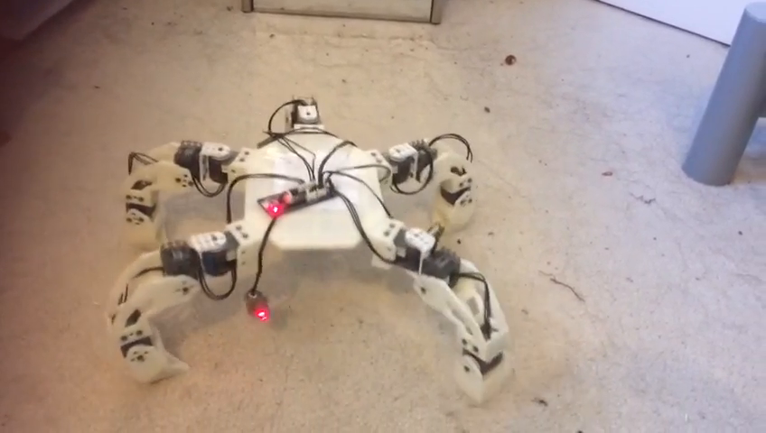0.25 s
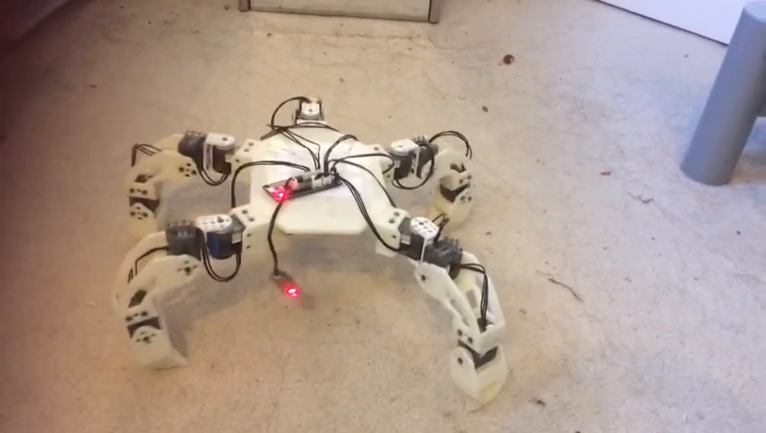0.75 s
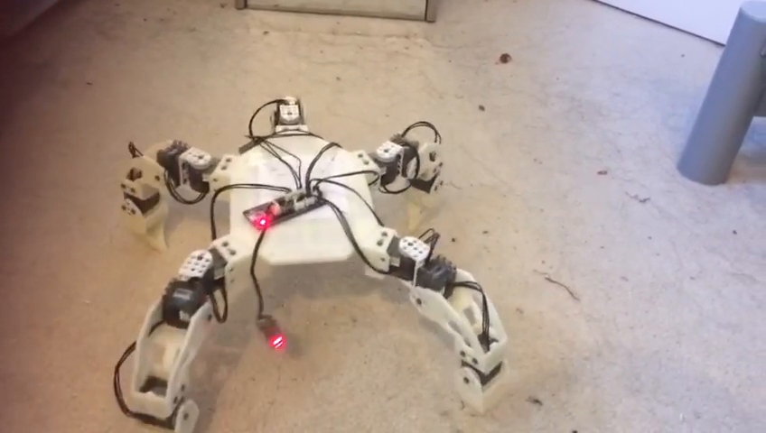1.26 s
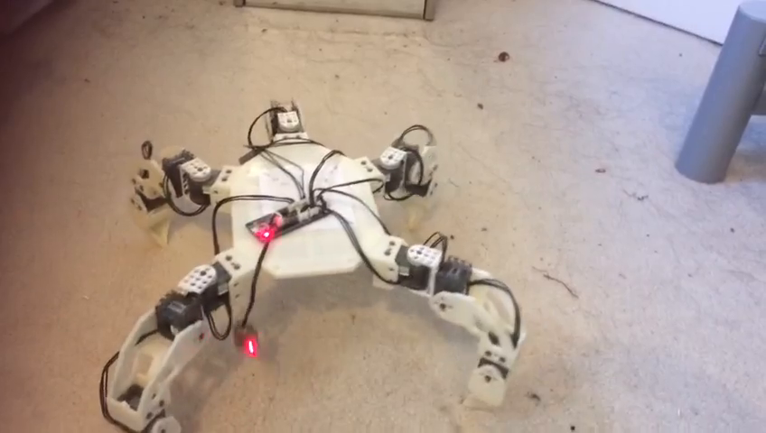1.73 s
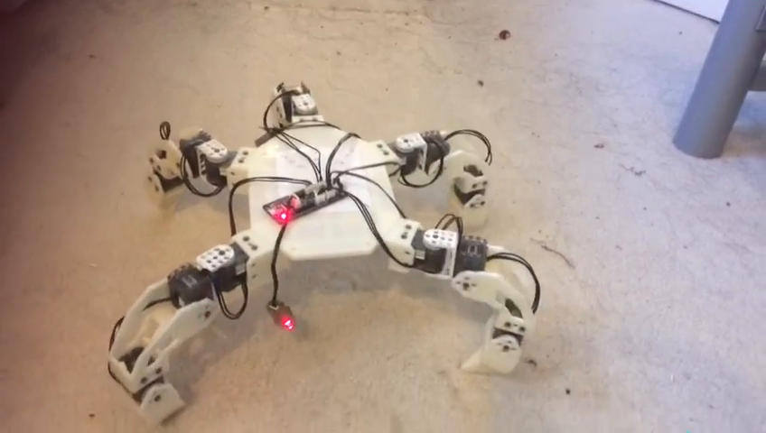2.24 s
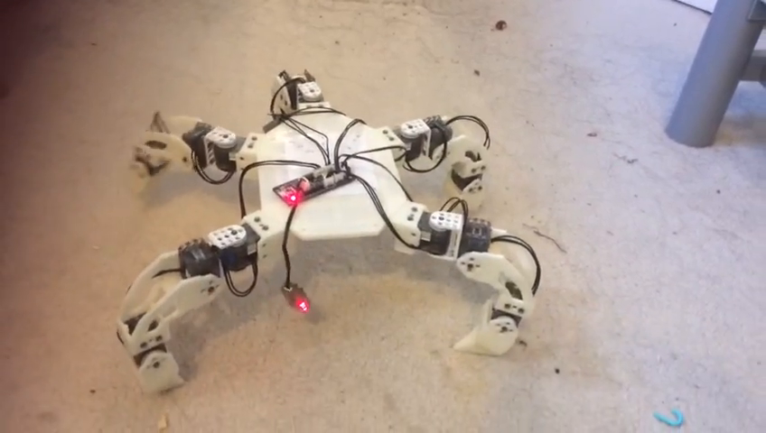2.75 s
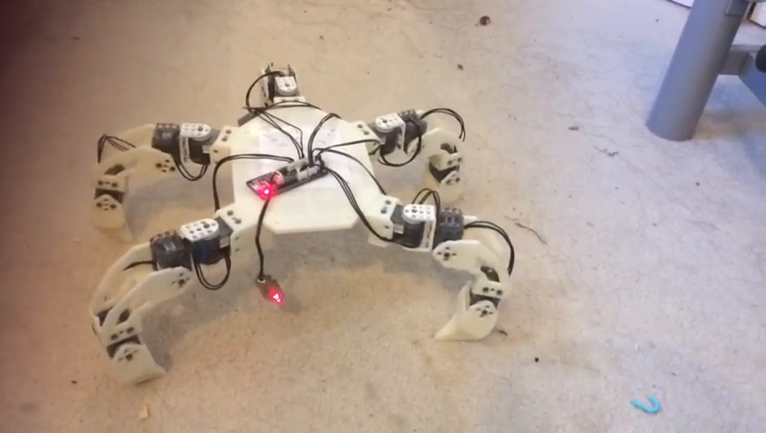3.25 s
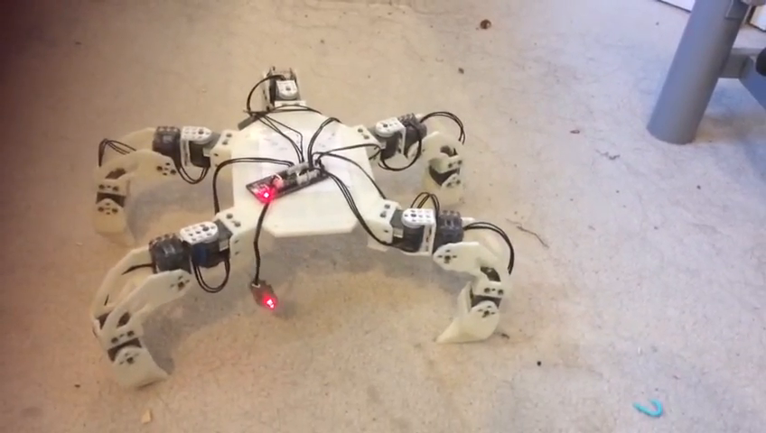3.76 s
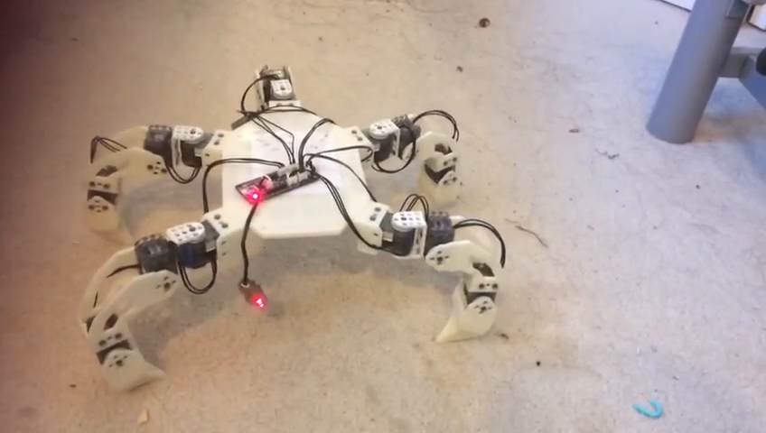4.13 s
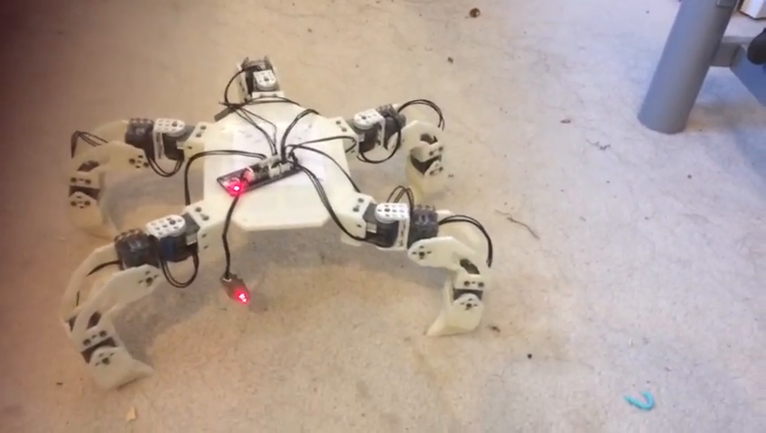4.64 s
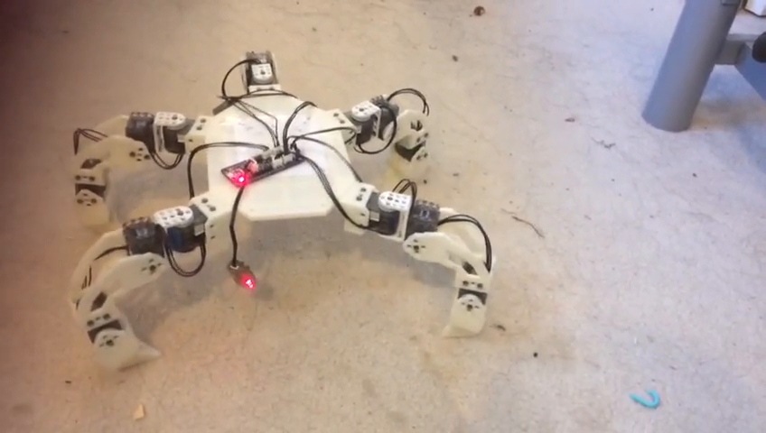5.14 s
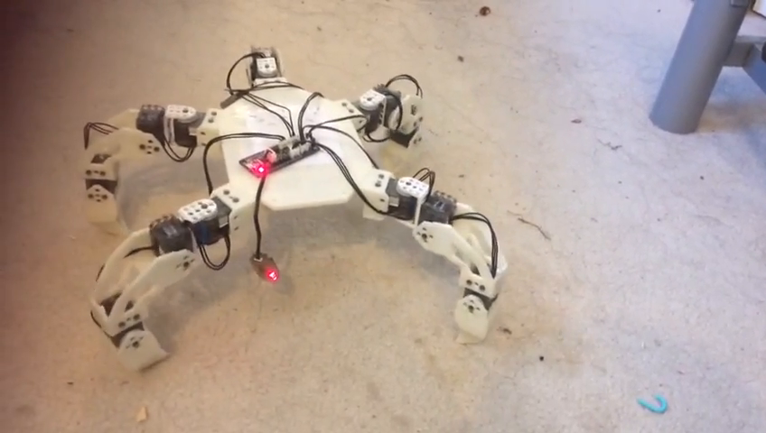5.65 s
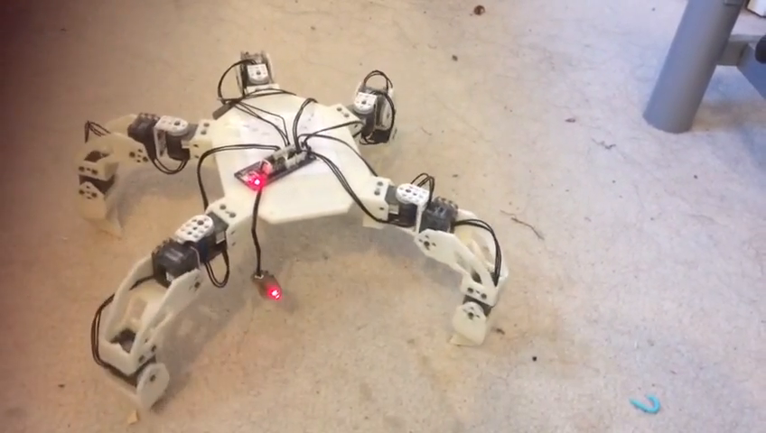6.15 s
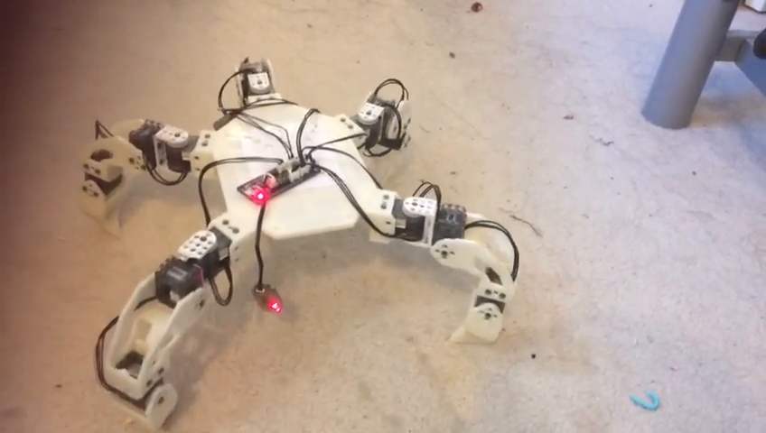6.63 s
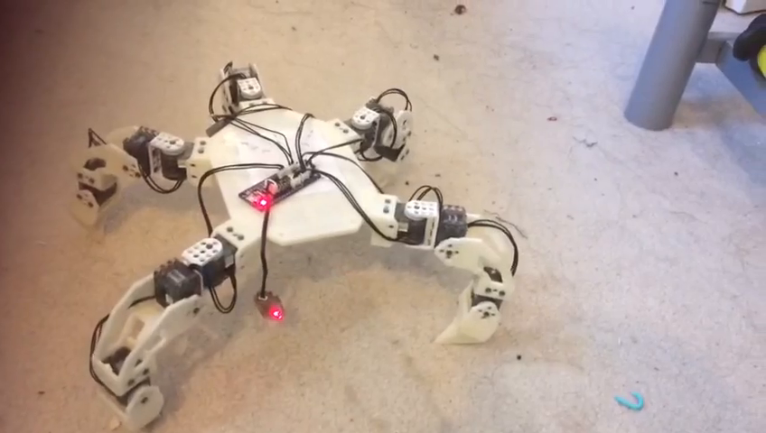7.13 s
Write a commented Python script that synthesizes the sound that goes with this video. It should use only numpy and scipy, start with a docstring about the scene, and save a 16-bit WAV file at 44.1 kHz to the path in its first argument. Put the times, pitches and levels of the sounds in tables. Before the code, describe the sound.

A small four-legged plastic robot steps on carpet about a metre from a phone microphone. Hard foot clacks and the loudest gear rasps, tinged with whine, come in the first two seconds. Another sharp knock lands just after three seconds, then quieter strokes, soft scuffs and clusters of small ticks follow, with moderate knocks near the end. The room is small and fairly dry, with low ventilation rumble, wavering hum and faint hiss.

```python
"""In a quiet room, a small four-legged plastic robot shuffles on a carpet about a metre from a phone.
Servo gears rasp in short throbbing strokes (tooth impacts through case resonances) and whine at times.
Feet scuff (grains through shell and pile resonances); joints and feet tick and knock (skids ringing
limb modes) and joints creak (gliding tones). The room adds a short tail; a ventilation rumble
(filtered noise), a wavering mains hum and a faint hiss lie beneath."""
import sys
import numpy as np
from scipy import signal
from scipy.fft import rfft, irfft
from scipy.io import wavfile
from scipy.ndimage import uniform_filter1d

SR = 44100
rng = np.random.default_rng(int(sys.argv[2]) if len(sys.argv) > 2 else 0)


def wav_out(sig):
    """Save sig, one row per channel (or a flat mono array), as 16-bit PCM at SR to the path in sys.argv[1]."""
    wavfile.write(sys.argv[1], SR, np.round(np.clip(np.atleast_2d(sig).T, -1, 1) * 32767).astype(np.int16))


def magnitude_from_level(level_db):
    """Linear magnitude for a level in decibels (20 dB per decade)."""
    exponent = np.asarray(level_db, float) / 20
    return 10 ** exponent


N = 325899  # length [samples]
ORDINARY_DB = -59.5  # gear level of an ordinary stroke

# ticks and knocks: (time [s], peak level before the room [dB], part struck, spectral tilt [dB per octave])
KNOCKS = [(0.006, -13.5, "foot", 1.8), (0.152, -37, "scuff", -1), (0.191, -41, "link", -0.5),
          (0.203, -36.5, "link", 1), (0.227, -33, "link", -0.5), (0.416, -12.5, "foot", 1),
          (0.6, -30, "scuff", 0.1), (1.288, -32.5, "joint", -2), (1.477, -35.5, "frame", 4),
          (1.537, -37.5, "joint", -2), (1.807, -37.5, "joint", -2.5), (1.847, -45, "frame", 1),
          (2.019, -44, "joint", 3), (2.036, -48, "shell", 4.5), (2.087, -44, "joint", 3),
          (2.211, -39, "link", 4), (2.364, -43, "joint", 5), (2.502, -48.5, "shell", 4.5),
          (2.636, -39, "shell", 4.5), (2.977, -39.5, "shell", -3), (3.032, -48.5, "frame", -6),
          (3.157, -12, "foot", -1), (3.235, -43, "link", 2), (3.337, -44.5, "shell", 0),
          (3.349, -20, "foot", -3.5), (3.589, -51, "shell", 2), (3.797, -52, "shell", -1),
          (3.852, -41, "link", -0.5), (3.933, -40.5, "frame", 0.5), (4.124, -47, "frame", -4),
          (4.189, -44, "joint", -4), (4.236, -46, "frame", -5.5), (4.279, -33.5, "scuff", 3.5),
          (4.359, -32.5, "scuff", -0.5), (4.441, -52, "shell", -1), (4.458, -36, "scuff", -0.5),
          (4.505, -47, "shell", 1.5), (4.529, -46, "shell", 5), (4.576, -48, "frame", 3),
          (4.585, -29.5, "frame", -1), (4.597, -36.5, "frame", -1.5), (4.615, -38, "link", -1),
          (4.624, -47, "link", -2), (4.666, -45, "frame", -3), (4.674, -42, "frame", -2.5),
          (4.706, -46, "shell", 0), (4.799, -43.5, "frame", 3), (4.851, -45, "link", 2),
          (5.453, -48, "shell", 2.5), (5.465, -44, "joint", 3), (5.763, -40.5, "joint", -3.5),
          (5.815, -47, "joint", -2), (5.892, -46, "link", -0.5), (5.985, -47, "frame", 0.1),
          (6.014, -43, "joint", 0.1), (6.152, -42, "joint", 0.1), (6.316, -48, "shell", 2),
          (6.39, -42.5, "link", 1.5), (6.503, -38, "joint", 4), (6.511, -44, "shell", 0.1),
          (6.539, -46, "joint", -1), (6.548, -41.5, "joint", -3.5), (6.714, -39, "link", 1),
          (6.771, -42.5, "frame", -4.5), (6.784, -46, "shell", 0), (6.941, -24, "shell", -0.2),
          (7.014, -40.5, "joint", 0), (7.129, -31, "shell", -1), (7.15, -31, "joint", 7),
          (7.164, -30, "scuff", 3.5), (7.283, -32, "shell", -0.8)]
# where a limb is struck sets its colour: part: (mode levels at five rising frequencies [dB])
PARTS = {"foot": (-51, -32.5, -20.5, -10.5, -26), "scuff": (-35.5, -21, -16.5, -10, -23),
         "joint": (-31.5, -26, -28, -8.5, -8), "shell": (-19.5, -16, -6.5, -13, -13.5),
         "frame": (-24.5, -4, -22.5, -9.5, -17.5), "link": (-32, -18, -25, -10, -18.5)}


def level(x, db):
    """Scale to an rms level: rms is the root of the mean power."""
    return x * magnitude_from_level(db) / np.sqrt(np.mean(x ** 2))


def band(x, hz, width):
    """One damped resonance, a second-order band-pass with gain 1 at its centre."""
    return signal.lfilter(*signal.iirpeak(hz, hz / width, SR), x)


def body(x, modes):
    """Modal superposition: parallel resonances, neighbours in opposite phase; rms 1."""
    total = 0
    for k, (hz, width, db) in enumerate(modes):
        total = total + (-1) ** k * magnitude_from_level(db) * band(x, hz, width)
    return level(total, 0)


def walk(rate):
    """Random modulation: levels held 1 / rate s and smoothed twice; spread near 1."""
    k = int(SR / rate)
    held = np.repeat(rng.standard_normal(N // k + 1), k)
    return 1.18 * uniform_filter1d(uniform_filter1d(held, k), k)[:N]


def grains(rate, spread_db, hiss_db):
    """Shot noise: tiny impacts at random moments, a few much larger, over a smooth hiss."""
    size = magnitude_from_level(spread_db * np.minimum(rng.exponential(size=N), 4.5))
    hits = (rng.random(N) < rate / SR) * size * rng.standard_normal(N)
    return level(hits, 0) + magnitude_from_level(hiss_db) * rng.standard_normal(N)


def spell(start_s, end_s):
    """Time gating: sample range, clock and soft on-off window of a short sound."""
    i, j = int(start_s * SR), int(end_s * SR)
    return slice(i, j), np.arange(i, j) / SR, signal.windows.tukey(j - i, .5)


def effort():
    """Power addition: strokes spin up, hold while the load drifts and run down; gear and foot level in dB."""
    # servo strokes: (start of the hold [s], hold [s], gear level at its start [dB],
    # gear level at its end [dB], foot scrape over the gears [dB])
    stroke_rows = [(0.0, 0.067, -37.5, -43, -17.5), (0.08, 0.06, -52.5, -46.5, -11),
                   (0.24, 0.049, -45, -42.5, -17.5), (0.309, 0.1, -54, -51.5, -17.5),
                   (0.435, 0.026, -50, -49, -25), (0.54, .07, -53.5, -56, -13),
                   (0.645, .05, -66.5, -71, -10), (0.76, 0.012, -64.5, -66, -5),
                   (0.85, 0.2, -50.5, -47, -17.5), (1.145, 0.15, -48, -51, -14.5),
                   (1.332, 0.056, -59.5, -64, -9.5), (1.439, 0.21, -55, -56.5, -12.5),
                   (1.772, .2, -46.5, -54.5, -12.5), (2.043, 0.13, -53, -46.5, -12),
                   (2.201, 0.14, -58.5, -61.5, -13), (2.349, 0.09, -57, -62, -13),
                   (2.653, 0.25, -54.5, -55, -10), (2.92, .1, -56.5, -59, -6.5),
                   (3.058, .09, -53.5, -53.5, -10), (3.188, 0.17, -65, -65.5, -7.5),
                   (3.562, .08, -66.5, -68, -8.5), (3.766, 0.034, -66, -69.5, -9),
                   (3.863, 0.14, -62.5, -63, -6.5), (4.116, 0.12, -69.5, -69, -3.5),
                   (4.288, 0.033, -59, -62, -10), (4.367, 0.08, -55.5, -61.5, -3),
                   (4.51, .05, -66.5, -67, -4), (4.595, 0.13, -65, -63, -4.5),
                   (4.76, 0.074, -69.5, -64, -7), (4.9, .03, -54, -55, -7),
                   (4.961, 0.091, -58.5, -53, -7.5), (5.083, 0.071, -60.5, -61.5, -6.5),
                   (5.201, .11, -59.5, -56.5, -11), (5.33, 0.092, -65.5, -69.5, -5),
                   (5.45, .02, -62.5, -65, -7), (5.498, 0.28, -66.5, -64, -6), (5.766, 0.2, -62, -67, -3.5),
                   (5.999, .17, -60.5, -56.5, -6.5), (6.194, .3, -63, -62.5, -5),
                   (6.532, 0.09, -60.5, -59.5, -7.5), (6.678, 0.098, -59, -55.5, -5),
                   (6.799, 0.13, -69, -61.5, -4), (6.97, 0.077, -64, -70, -4.5),
                   (7.138, 0.094, -59, -59, -3), (7.27, 0.082, -68, -65, -1)]
    spin_up_db_per_s, run_down_db_per_s, idle_db = 379, 338, -78
    t = np.arange(0, N + 64, 64) / SR
    gear = foot = magnitude_from_level(idle_db) ** 2
    for s, hold, first_db, last_db, foot_db in stroke_rows:
        times = [s - 1, s, s + hold, s + hold + 1]
        levels = [first_db - spin_up_db_per_s, first_db, last_db, last_db - run_down_db_per_s]
        power = magnitude_from_level(2 * np.interp(t, times, levels))
        gear = gear + power
        foot = foot + power * magnitude_from_level(2 * foot_db)
    return [np.interp(np.arange(N) / SR, t, 10 * np.log10(power)) for power in (gear, foot)]


def strokes(gear_db, foot_db):
    """Source and resonator: teeth and scraping grains, juddering as a servo chases its target, drive bodies."""
    # servo case under the gear teeth: (frequency [Hz], width [Hz], relative level before the treble tilt [dB])
    case_modes = [(4560, 1520, -11), (5370, 800, -7), (6360, 890, -8.5), (7450, 1380, -7), (8470, 1260, -7),
                  (9350, 1110, -9), (11060, 1300, -14), (3600, 570, -13)]
    # foot shells dragged over the pile: (frequency [Hz], width [Hz], relative level [dB])
    foot_modes = [(1977, 350, -4), (2546, 350, -1), (2840, 404, -2), (3550, 790, -7)]
    # carpet and frame under a soft rub: (frequency [Hz], width [Hz], relative level [dB])
    pile_modes = [(442, 220, 2), (780, 152, 4.5), (946, 144, 4), (1400, 290, -1)]
    # harder strokes are brighter: tilt in dB per octave about 7 kHz, and its gain for each dB of effort
    ordinary_tilt_db, tilt_per_db = 3, 0.11
    # carpet rub at an ordinary scrape, and the share of the scrape's swell that it follows
    scrape_db, rub_db, rub_follows = -67.5, -69, 0.5
    slide_rub_db = -10.5  # carpet rub under the scrape that trails a knock

    tilt_db = ordinary_tilt_db + tilt_per_db * (gear_db - ORDINARY_DB)
    pile_db = rub_db + rub_follows * (foot_db - scrape_db)
    judder, slide = walk(60), slides()
    teeth = level(grains(rate=5000, spread_db=1.5, hiss_db=-0.5), 0) + whine()

    # each part of the case catches the load at its own moments
    gears = 0
    for k, (hz, width, db) in enumerate(case_modes):
        gain = magnitude_from_level(db + tilt_db * np.log2(hz / 7000) + 1.0 * walk(40))
        gears = gears + (-1) ** k * gain * band(teeth, hz, width)
    gears = level(gears * magnitude_from_level(2.1 * judder), 0) * magnitude_from_level(gear_db)

    scrape = grains(rate=1100, spread_db=2.5, hiss_db=0.5) * magnitude_from_level(1.0 * judder + 1.2 * walk(30))
    feet = body(scrape, foot_modes) * (magnitude_from_level(foot_db) + slide)
    rub = grains(rate=600, spread_db=1.0, hiss_db=4) * magnitude_from_level(2.6 * walk(30))
    pile = body(rub, pile_modes) * (magnitude_from_level(pile_db) + magnitude_from_level(slide_rub_db) * slide)
    return gears + feet + pile


def whine():
    """Tooth-mesh harmonics: the rate rises as the motor gathers speed; each overtone flickers on its own."""
    # motor whine: (time [s], length [s], first tooth rate [Hz], tooth rate approached [Hz],
    # level over the gear rasp ahead of the case [dB])
    whine_rows = [(0.057, .09, 610, 730, -8), (0.218, 0.071, 597, 734, -4), (0.308, 0.032, 675, 750, -2),
                  (0.358, .045, 645, 732, -6.5), (0.87, .17, 710, 776, -7), (1.151, .15, 700, 748, -9.5),
                  (1.55, 0.094, 700, 747, -4.5)]
    speed_settles = .4  # time constant as a share of the length
    out = np.zeros(N)
    for s, length, first_hz, last_hz, db in whine_rows:
        span, t, window = spell(s, s + length)
        hz = last_hz + (first_hz - last_hz) * np.exp(-(t - s) / (speed_settles * length))
        phase = 2 * np.pi * np.cumsum(hz * (1 + 0.0045 * walk(150)[span])) / SR
        tone = 0
        for k in range(4, 15):
            tone = tone + magnitude_from_level(2.3 * walk(44.8)[span] - 0.91 * k) * np.sin(k * phase + k * k)
        out[span] += level(tone, db) * window
    return out


def slides():
    """Exponential decay: a knocked foot slides on, and its scrape fades; gives the scrape's amplitude."""
    under_knock_db, t60_s = -31.5, 0.096
    kicks = np.zeros(N)
    for s, peak_db, *_ in KNOCKS:
        kicks[int(s * SR)] = magnitude_from_level(peak_db + under_knock_db)
    return signal.lfilter([1], [1, -np.exp(-np.log(1000) / (t60_s * SR))], kicks)


def knocks(rows):
    """Modal excitation: a short gritty skid rings the limb modes, coloured by the part struck."""
    # plastic limbs: (frequency before detuning [Hz], level before colour and scatter [dB], t60 [s])
    limb_modes = [(342, -1.5, 0.026), (438.5, 3, 0.06), (607, 1, 0.016), (802, -3, 0.028),
                  (884, 0.5, 0.019), (1080, -2.5, 0.017), (1370, 2.5, 0.018), (1660, 3.5, 0.018),
                  (1965, 5.5, 0.0092), (2430, 1.5, 0.0075), (2757, 1.5, 0.015), (3050, 0, 0.0083),
                  (3545, -4, 0.011), (4100, 0.5, 0.0094), (4760, 0.5, 0.0096), (5190, -2, 0.0092),
                  (5580, -1.5, 0.0095), (6017, 1.5, 0.012), (6750, 6, 0.0091), (7240, 4.5, 0.0054),
                  (7940, 0.5, 0.0054), (7610, 1, 0.0045), (8870, 11.5, 0.0035), (10200, 8, 0.0044),
                  (10500, 6, 0.0046), (11350, 2, 0.0026)]
    # frequencies at which PARTS gives its levels: (frequency [Hz])
    colour_hz = [500, 1050, 2200, 5000, 9000]
    skid_s, scuff_s = 0.00099, 0.0044  # decay constants: a glancing scuff skids longer
    rattle_db, rattle_s = -24.5, 0.011  # loose parts chatter on after a contact

    out, t = np.zeros(N + SR), np.arange(SR // 12) / SR
    hz, mode_db, t60 = np.transpose(limb_modes)[:, :, None]
    signs = (-1.) ** np.arange(len(limb_modes))[:, None]  # neighbouring modes move in opposite phase
    chance = rng.random((len(rows), 2, len(limb_modes), 1))
    grit = rng.standard_normal((len(rows), len(t)))
    for (s, peak_db, part, tilt_db), (detune, scatter), g in zip(rows, chance, grit):
        colour_db = np.interp(np.log(hz), np.log(colour_hz), PARTS[part])
        colour_db = colour_db + tilt_db * np.log2(hz / colour_hz[2])
        ring = np.sin(2 * np.pi * hz * (1 + 0.062 * (detune - .5)) * t) * np.exp(-np.log(1000) * t / t60)
        # each mode swells over its first cycles, which keeps bright blows free of thud
        ring = ring * (1 - np.exp(-t * hz / 0.5))
        # the force builds in about half a millisecond, then dies as the skid ends
        fade = np.exp(-t / (scuff_s if part == "scuff" else skid_s)) + magnitude_from_level(rattle_db) * np.exp(-t / rattle_s)
        force = g * np.abs(g) * np.minimum(t / 0.00053, 1) * fade
        rung = signal.fftconvolve(force[None], ring, axes=1)[:, :len(t)]
        rung = rung / np.abs(rung).max(axis=1, keepdims=True)
        blow = (signs * magnitude_from_level(mode_db + colour_db + 5.2 * scatter) * rung).sum(axis=0)
        i = int(s * SR)
        out[i:i + len(t)] += magnitude_from_level(peak_db) * blow / np.abs(blow).max()
    return out[:N]


def play(gear_db):
    """Random impacts of loose joints: faint ticks, louder with effort, as rows like KNOCKS."""
    count = 30
    base_db, spread_db, follows = -53, 5.5, .5  # lowest peak at an ordinary stroke, spread, share of effort
    when, size, part = rng.random((count, 3)).T
    i = (when * (N - 1)).astype(int)
    names = np.array(list(PARTS))[(part * len(PARTS)).astype(int)]
    peak_db = follows * (gear_db[i] - ORDINARY_DB) + base_db + spread_db * size
    return list(zip(i / SR, peak_db, names, 0 * size))


def creaks():
    """Stick-slip: joints under load give brief tones, steady or sagging, roughened by slipping."""
    # creaking joints: (time [s], length [s], first frequency [Hz], last frequency [Hz], rms level [dB])
    creak_rows = [(2.083, .035, 1370, 1370, -69), (2.13, .05, 1058, 986, -66),
                  (2.136, 0.067, 780, 748, -64), (3.07, .05, 1890, 1890, -67.5),
                  (4.655, 0.036, 1080, 1050, -65)]
    out, slip = np.zeros(N), magnitude_from_level(3.6 * walk(150))
    for s, length, first_hz, last_hz, db in creak_rows:
        span, t, window = spell(s, s + length)
        tone = np.sin(2 * np.pi * np.cumsum(np.linspace(first_hz, last_hz, len(t))) / SR)
        out[span] += level(tone * window * slip[span], db)
    return out


def room(x):
    """Reverberation by convolution: a wall echo within a short, soft tail from walls and furniture."""
    t60_s, tail_db, dull_hz = .16, -21.5, 10000
    echo_s, echo_db = .008, -20.5
    hollow_s, hollow_hz, hollow_t60_s, hollow_db = .011, 1383, 0.044, -29.5

    t = np.arange(SR // 3) / SR
    tail = rng.standard_normal(len(t)) * np.exp(-np.log(1000) * t / t60_s) * (t > .006)
    tail = signal.lfilter(*signal.butter(1, dull_hz, fs=SR), tail)
    tail = tail * magnitude_from_level(tail_db) / np.sqrt(np.sum(tail ** 2))
    tail[int(echo_s * SR)] += magnitude_from_level(echo_db)
    # a hollow piece of furniture answers late at its own pitch
    late = np.maximum(t - hollow_s, 0)
    ring = np.sin(2 * np.pi * hollow_hz * late) * np.exp(-np.log(1000) * late / hollow_t60_s)
    tail = tail + ring * magnitude_from_level(hollow_db) / np.sqrt(np.sum(ring ** 2))
    return x + signal.fftconvolve(x, tail)[:N]


def rumble():
    """Room modes: ventilation noise feeds low resonances, swelling slowly, with a wavering mains hum."""
    # room resonances: (frequency [Hz], nominal width, widened below [Hz], rms level before the swell [dB])
    room_modes = [(36.5, 23, -75), (56.6, 22, -60), (90.5, 11.6, -59), (110.8, 11.8, -56.5),
                  (119.6, 4.6, -60), (145.4, 18.3, -61.5), (158.3, 12.6, -62.5), (175.7, 12.4, -59),
                  (191.6, 20.3, -65.5), (226.8, 31.5, -70.5), (248.3, 18, -81.5)]
    mains_hz, mains_db = 120.5, -57.5
    noise = 0
    for hz, width, db in room_modes:
        wide = 1.53 * width  # two passes in series narrow the resonance
        noise = noise + level(band(band(rng.standard_normal(N), hz, wide), hz, wide), db)
    hum = np.sin(2 * np.pi * mains_hz * np.arange(N) / SR) * magnitude_from_level(5.1 * walk(5.0))
    return noise * magnitude_from_level(1.44 * walk(7.7)) + level(hum, mains_db)


def air():
    """Spectral shaping of white noise: the faint steady hiss of still air and microphone."""
    # hiss spectrum: (frequency [Hz], relative level per Hz [dB])
    hiss_spectrum = [(30, -25.5), (250, -1.5), (330, 5.5), (700, -8), (1500, -23.5), (4000, -16),
                     (11000, -20.5), (12500, -20.5)]
    hz, db = np.transpose(hiss_spectrum)
    f = np.maximum(np.fft.rfftfreq(N, 1 / SR), 1)
    gain = magnitude_from_level(np.interp(np.log(f), np.log(hz), db))
    return level(irfft(rfft(rng.standard_normal(N)) * gain, N), -70.5)


def scene():
    """Superposition: the robot, heard through its room, over the background."""
    gear_db, foot_db = effort()
    robot = strokes(gear_db, foot_db) + creaks() + knocks(KNOCKS + play(gear_db))
    return (room(robot) + rumble() + air())[None]


def low_pass(x):
    """Removes everything above the highest recorded frequency."""
    return signal.sosfilt(signal.butter(12, 12660, fs=SR, output="sos"), x)


def record(dry):
    """Low-pass filtering: the phone cuts the top of the spectrum."""
    top_hz = 11480
    mix = signal.sosfilt(signal.cheby1(8, 1, top_hz, fs=SR, output="sos"), dry)
    return low_pass(mix)


dry = scene()
out = record(dry)
wav_out(out)
```